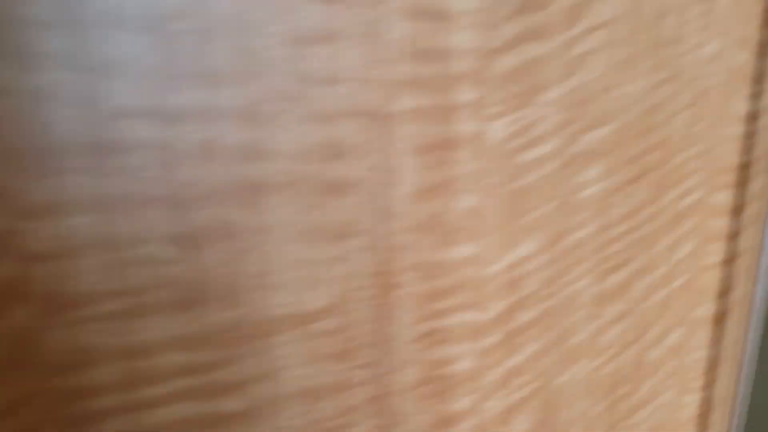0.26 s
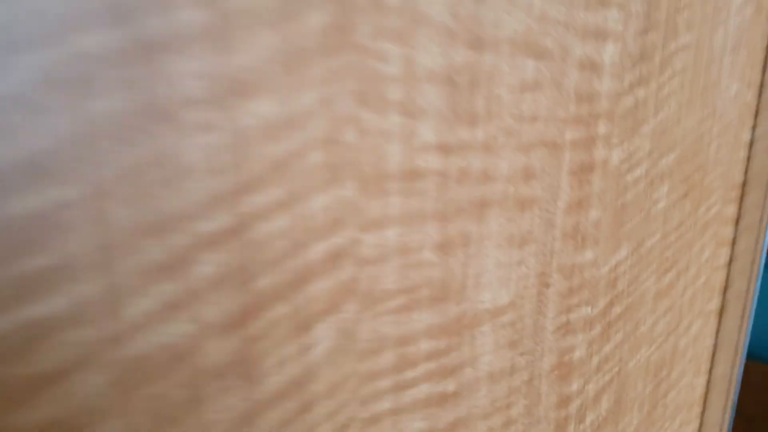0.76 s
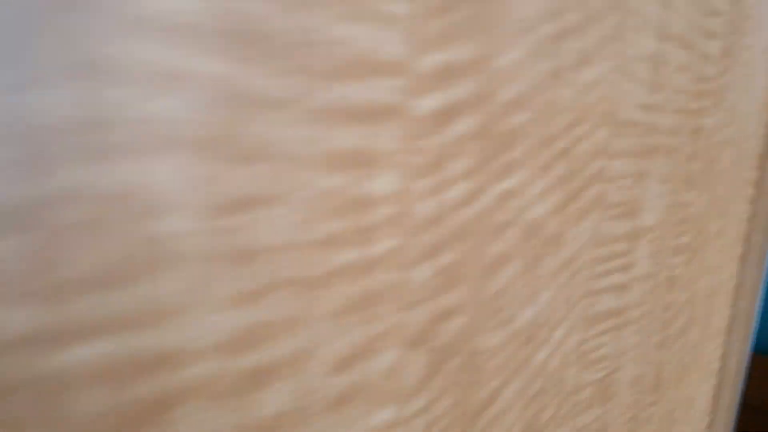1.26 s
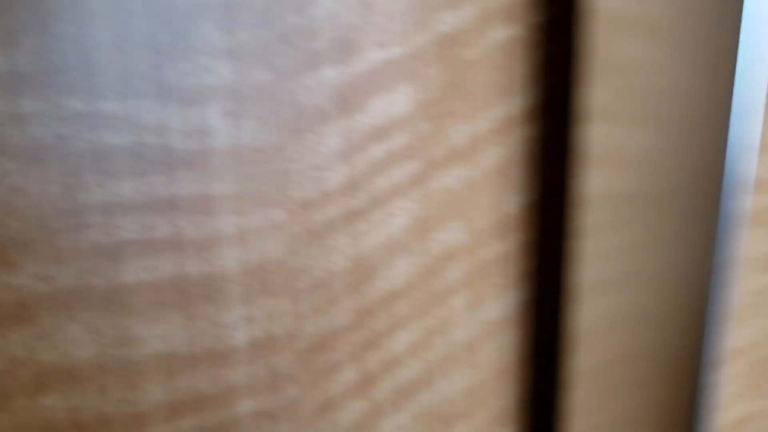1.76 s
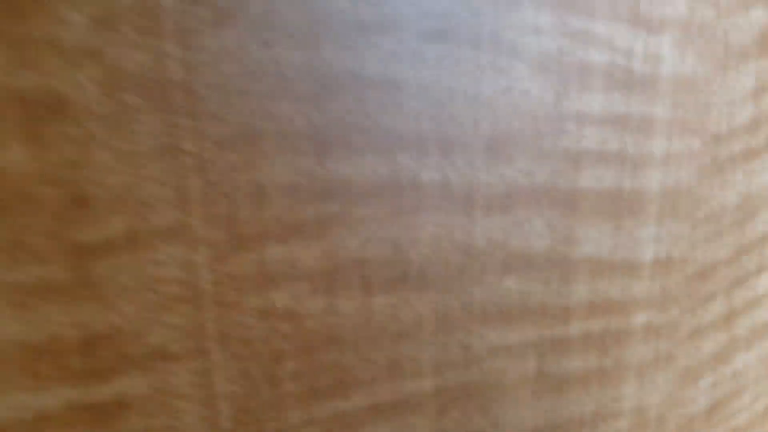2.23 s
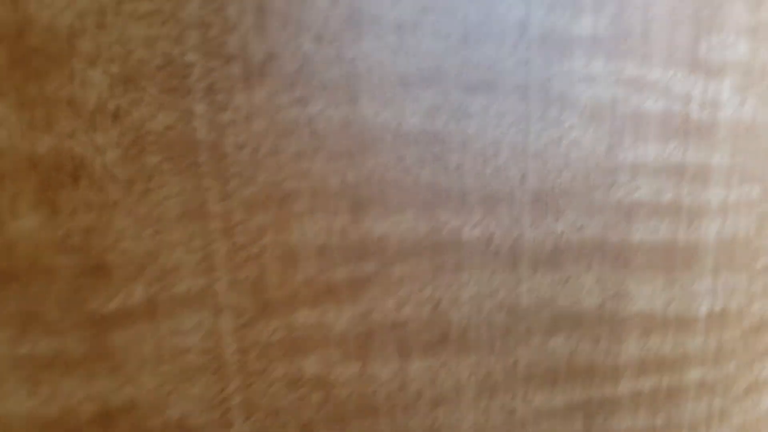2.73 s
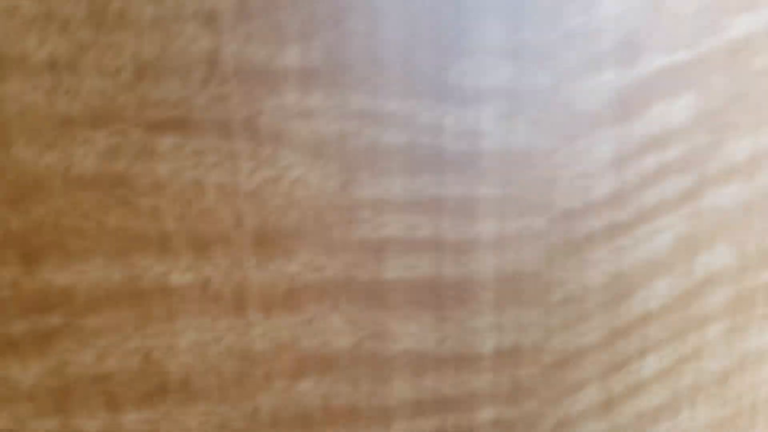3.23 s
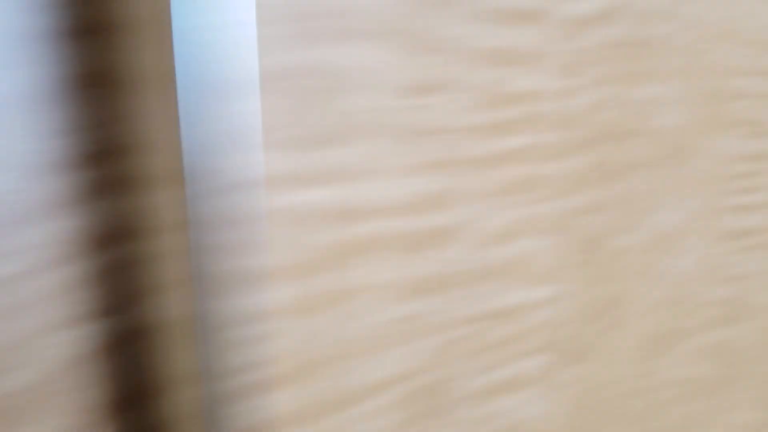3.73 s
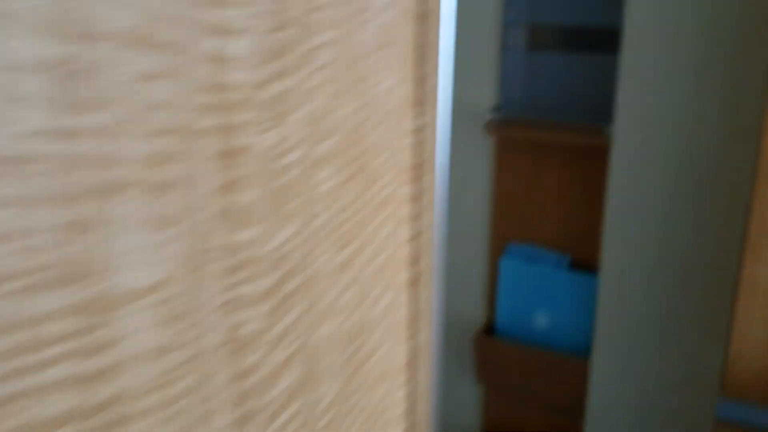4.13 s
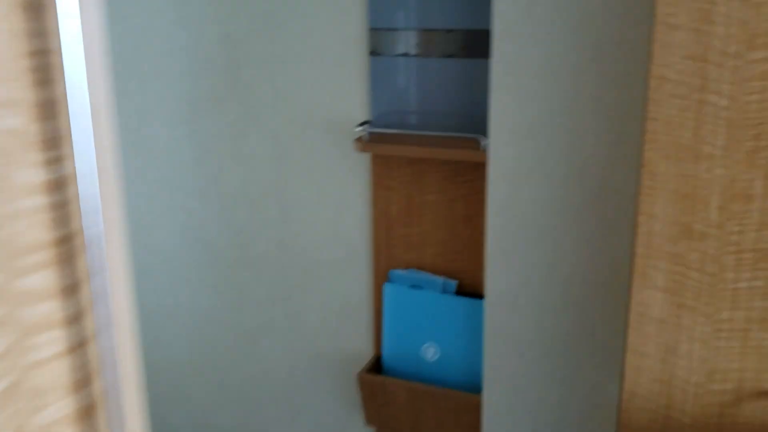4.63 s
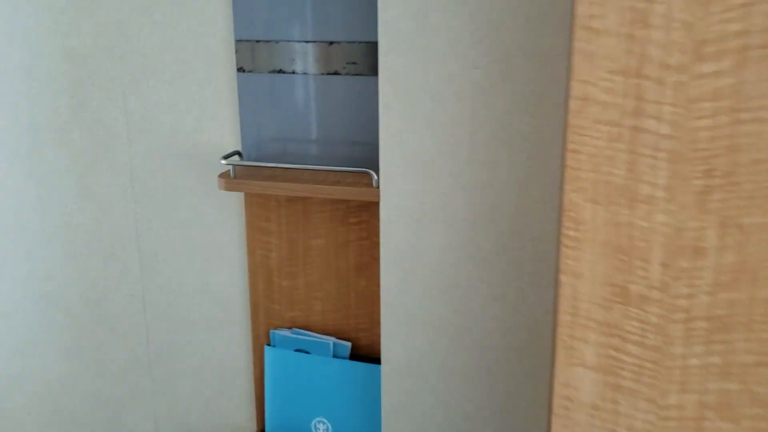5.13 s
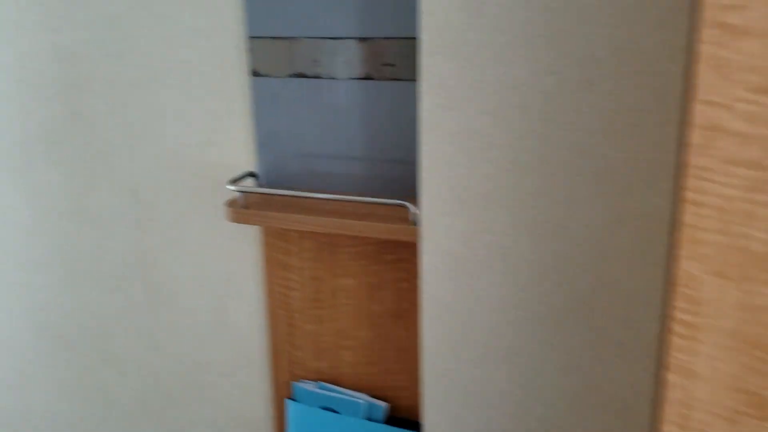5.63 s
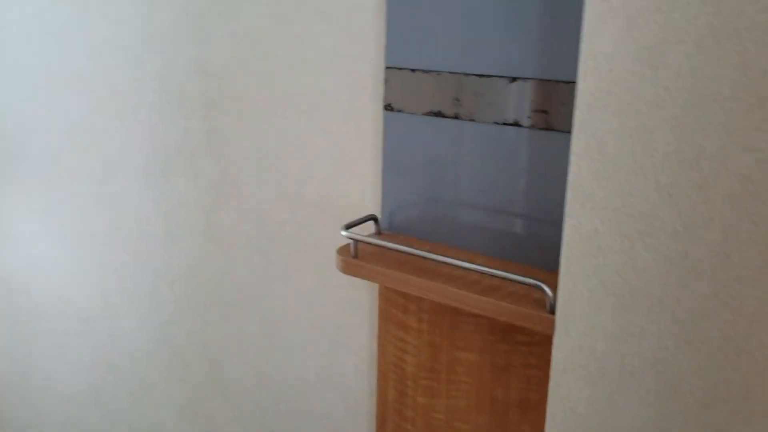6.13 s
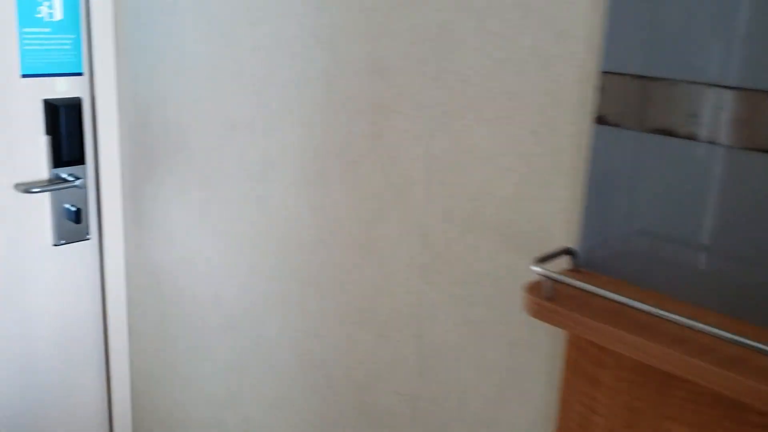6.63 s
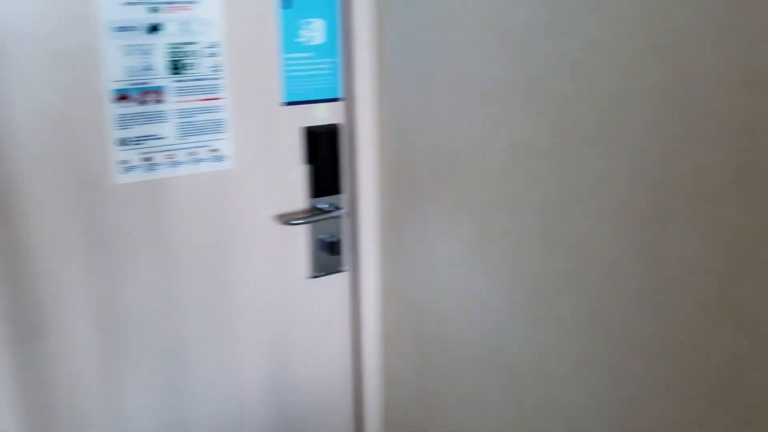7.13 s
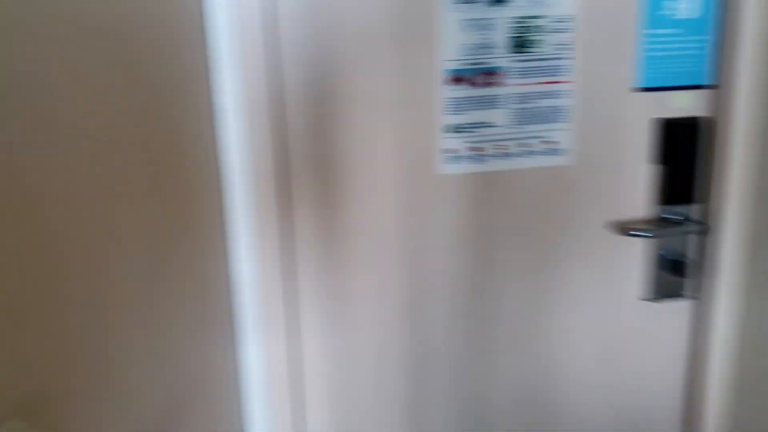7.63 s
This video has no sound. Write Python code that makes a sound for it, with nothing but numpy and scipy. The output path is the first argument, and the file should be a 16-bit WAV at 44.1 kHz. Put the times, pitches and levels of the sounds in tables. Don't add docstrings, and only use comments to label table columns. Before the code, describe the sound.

Low ventilation hum, a rumbling wooden slide ending in a sharp clack and chatter, faint handling rustles, then a hard door knock with a soft bounce.

```python
import sys
import numpy as np
from scipy import signal
from scipy.fft import rfft, irfft, next_fast_len
from scipy.io import wavfile
from scipy.ndimage import uniform_filter1d, map_coordinates

SR = 44100
rng = np.random.default_rng(int(sys.argv[2]) if len(sys.argv) > 2 else 0)


def master_out(mix):
    frames = np.transpose(np.atleast_2d(mix))
    ceiling = np.clip(frames, -1, 1)
    pcm = np.round(ceiling * 32767).astype(np.int16)
    wavfile.write(sys.argv[1], SR, pcm)


def nominal_scale(level):
    x = np.asarray(level, float) / 20
    return 10 ** x


N = 347609
TOP_HZ = 15870


def unit(x):
    return x / np.sqrt(np.mean(x ** 2) + 1e-20)


def along(points, hz):
    f, v = np.transpose(points)
    return np.interp(np.log(hz + 1), np.log(f + 1), v)


def curves(rows):
    s, *cols = np.transpose(rows)
    return [np.interp(np.arange(N) / SR, s, c) for c in cols]


def wobble(rate):
    knots = rng.standard_normal(int(N * rate / SR) + 4)
    return map_coordinates(knots, [np.arange(N) * rate / SR])


def filtered(x, response):
    m = next_fast_len(x.shape[-1] + 8192)
    spectrum = rfft(x, m) * response(np.fft.rfftfreq(m, 1 / SR))
    return irfft(spectrum, m)[..., :x.shape[-1]]


def resonant(modes):
    def response(f):
        total = 0
        for k, (centre, width, db) in enumerate(modes):
            damping = 1j * f * width
            total = total + (-1) ** k * nominal_scale(db) * damping / (centre * centre - f * f + damping)
        return total
    return response


# f/Hz, left-right likeness
COHERENCE = [(60, 1), (250, 0.97), (700, 0.53), (3000, 0.18), (12000, 0.21)]


def coherence_angle(hz):
    return np.arccos(np.clip(along(COHERENCE, hz), -1, 1)) / 2


def spread(pair, response):
    def mid_side(hz):
        angle = coherence_angle(hz)
        return response(hz) * (hz < TOP_HZ) * [np.cos(angle), np.sin(angle)]
    mid, side = filtered(pair, mid_side)
    return unit(np.array([mid + side, mid - side]))


def grit(spike_db, streak_db):
    noise = rng.standard_normal((2, N)) * nominal_scale(spike_db * rng.standard_normal(N))
    z = signal.stft(noise, nperseg=1024)[2]
    field = uniform_filter1d(rng.standard_normal(z.shape[1:]), size=3, axis=0)
    field = uniform_filter1d(field, size=14, axis=1)
    return signal.istft(z * nominal_scale(streak_db * unit(field)), nperseg=1024)[1][:, :N]


def strokes(rows, rise, fall):
    t = np.arange(0, N + 64, 64) / SR
    s, length, *levels = np.transpose(rows)[:, :, None]
    shape_db = -rise * np.clip(s - t, 0, None) - fall * np.clip(t - s - length, 0, None)
    powers = [np.sum(nominal_scale(2 * (db + shape_db)), axis=0) for db in levels]
    return [np.interp(np.arange(N) / SR, t, power) for power in powers]


def place(out, s, sound):
    start = round(s * SR)
    out[:, start:start + sound.shape[-1]] += sound


# f/Hz, level/dB per Hz
HUM_SPECTRUM = [(12, -7), (20, -2.5), (44, 1), (70, 4.5), (116, -6), (204, -22.5), (270, -8.5),
                (388, -18.5), (434, -15.5), (976, -70.5), (4540, -55), (7730, -38.5), (9140, -59),
                (14300, -53.5), (16000, -65)]


def hum():
    return nominal_scale(-50 + 2.0 * wobble(10.0)) * spread(grit(0, 1), lambda hz: nominal_scale(along(HUM_SPECTRUM, hz)))


# f/Hz, width/Hz, level/dB
SWAY_MODES = [(35.3, 8.6, -3.5), (60, 17, -9), (81.8, 10.9, 1)]
# f/Hz, width/Hz, level/dB
DRUM_MODES = [(94, 19, -3.5), (130.9, 13.4, 3), (181.9, 7.2, -1.66), (215.6, 20, -8)]
# t/s, level/dB
TREMBLE_LEVEL = [(0, -44), (.7, -44.5), (.82, -35), (.96, -31.5), (1.05, -40.5), (1.14, -30.5),
                 (1.65, -24.5), (1.86, -25), (1.97, -35), (2.11, -32), (2.17, -43), (2.22, -32),
                 (2.37, -34), (2.5, -40), (3.3, -44), (4.3, -44), (5.3, -49), (7.88, -51.5)]
# t/s, level/dB
SHAKE_LEVEL = [(0, -4.5), (1.78, 3), (1.84, 1), (2.17, -11), (2.21, 4.5), (2.45, -7), (2.55, -4.5),
               (6.9, 6), (7.05, -7.5), (7.88, -12)]
# t/s, length/s, sway level/dB, drumming level/dB
SHOVES = [(.57, 0.033, -60, -66), (.79, 0.21, -36.5, -41), (1.05, 0.2, -40, -38.5), (1.33, 0.02, -38, -26),
          (1.49, 0.023, -29, -41), (1.72, 0.045, -34, -25), (1.84, 0.036, -23, -40),
          (2.01, 0.055, -26.5, -38.5), (2.24, 0.15, -32, -50), (2.93, .03, -50, -59),
          (3.36, 0.04, -40, -56), (3.5, 0.15, -45, -66), (3.87, 0.054, -34.5, -47), (4.03, 0.022, -41, -47),
          (4.26, 0.022, -42.5, -44.5), (4.85, 0.099, -54, -45), (5.35, 0.011, -65.5, -47.5),
          (5.97, 0.022, -52, -67.5), (6.2, 0.066, -48, -43.5), (6.33, 0.015, -52, -46.5),
          (6.66, 0.16, -51.5, -62), (7.06, 0.05, -47, -55), (7.3, 0.025, -48.5, -57),
          (7.53, 0.088, -46.5, -55.5), (7.77, 0.063, -44, -61)]
SWING_HZ = 52.4
SWAY_DB = -8
SWAY_WAVERS_DB, DRUM_WAVERS_DB = 2, 2


def even(x):
    power = uniform_filter1d(np.mean(x ** 2, axis=0), size=2600)
    return x / np.sqrt(np.abs(power) + 0.17)


def panel():
    tremble_db, = curves(TREMBLE_LEVEL)
    sway_jolts, drum_jolts = strokes(SHOVES, rise=453, fall=157.5)
    sway_tremble = nominal_scale(2.034 * (tremble_db + SWAY_DB + SWAY_WAVERS_DB * wobble(10)))
    drum_tremble = nominal_scale(2.082 * (tremble_db + DRUM_WAVERS_DB * wobble(12)))
    swing = np.sin(2 * np.pi * SWING_HZ * np.cumsum(1 + 0.058 * wobble(9.9)) / SR)
    shake = nominal_scale(curves(SHAKE_LEVEL)[0])
    rough = even(spread(grit(0, 0), resonant(SWAY_MODES)))
    sway = (np.sqrt(2) * swing + shake * rough) / np.sqrt(1 + shake ** 2)
    body = resonant([(150, 200, 0)])
    drum = even(spread(grit(0, 0), lambda hz: resonant(DRUM_MODES)(hz) * body(hz)))
    return np.sqrt(sway_tremble + sway_jolts) * sway + np.sqrt(drum_tremble + drum_jolts) * drum


# f/Hz, level/dB per Hz
ROLLING_SPECTRUM = [(150, -31.5), (250, -3.5), (358, -2), (653, -4.5), (842, -5), (1020, -5.5),
                    (1300, -9.5), (3000, -17.5), (9000, -46.5), (11700, -75.5), (19800, -120)]
# f/Hz, width/Hz, level/dB
CARCASS_MODES = [(300, 150, 4), (377, 40, -9), (600, 45, -8), (900, 71, -2), (1220, 460, -4),
                 (2100, 590, -13)]


def roll(slide_db, wood_power):
    uneven = nominal_scale(1.7 * (1.3 * wobble(25) + 1.6 * wobble(8.2)))
    roll_db = 10 * np.log10(nominal_scale(2 * slide_db) + uneven * (wood_power + nominal_scale(2 * -85)))
    crowd = rng.standard_normal(1200)

    def wood(hz):
        close_modes = nominal_scale(2.6 * np.interp(hz / 14, np.arange(len(crowd)), crowd))
        carcass = 1.5 + np.abs(resonant(CARCASS_MODES)(hz)) * nominal_scale(-9.0)
        return nominal_scale(along(ROLLING_SPECTRUM, hz)) * carcass * close_modes

    grind = spread(grit(3.5, 2.2), wood)
    force = np.clip((roll_db + 72.5) / 16, 0, 1)
    dull = unit(filtered(grind, lambda hz: 1 / (1 + (hz / 850) ** 4)))
    return nominal_scale(roll_db + 0.68) * (force * grind + (1 - force) * dull)


# f/Hz, level/dB per Hz
RUSTLE_SPECTRUM = [(880, -60), (1500, 1), (1900, -4.5), (2390, -3), (3250, -2.5), (5330, -3.5), (6000, -3),
                   (7610, -1.5), (8740, -10), (15100, -5.5), (16000, -28.5)]


def rustle(slide_db, cloth_power):
    air_power = nominal_scale(2 * (-55.5 + 0.98 * (slide_db - slide_db.max())))
    air_power = air_power * (slide_db > -58) * (np.arange(N) < 2.1 * SR)
    power = uniform_filter1d(air_power, size=2000) + cloth_power + nominal_scale(2 * -86)
    hiss_db = 10 * np.log10(power) + 3.0 + 0.46 * wobble(54)
    return nominal_scale(hiss_db) * spread(grit(2.5, 1.8), lambda hz: nominal_scale(along(RUSTLE_SPECTRUM, hz)))


# t/s, rolling level/dB
DOOR_RUN = [(.64, -93), (.664, -58.5), (.85, -51), (1.01, -52), (1.09, -41.5), (1.22, -36), (1.37, -34),
            (1.75, -35.5), (1.93, -43), (2.04, -83)]
# t/s, length/s, wood level/dB, cloth level/dB
SLOW_MOVES = [(0, 0.39, -72, -73), (.42, 0.29, -75, -79.5), (2.09, 0.18, -57, -66), (.82, .08, -66, -65),
              (2.48, 0.14, -55.5, -102), (2.82, 0.11, -58.5, -75.5), (3.0, 0.33, -61, -70),
              (3.32, 0.062, -52.5, -71.5), (3.46, 0.13, -65, -70), (3.67, 0.19, -56, -62),
              (3.93, 0.12, -57, -71.5), (4.09, 0.47, -60.5, -64), (4.7, 0.092, -64.5, -69.5),
              (4.94, 0.44, -64.5, -70.5), (5.38, 0.31, -68.5, -80), (5.8, 0.33, -66.5, -74),
              (6.42, 0.17, -62.5, -75.5), (6.85, 0.55, -69.5, -75), (7.68, 0.075, -70.5, -75),
              (7.78, 0.15, -67.5, -67)]
# t/s, length/s, wood level/dB, cloth level/dB
HAND_BRUSHES = [(0.088, .05, -60, -70.5), (0.29, 0.073, -69.5, -69.5), (0.393, .02, -81, -80),
                (0.557, 0.047, -65.5, -70), (0.93, 0.031, -50, -56.5), (1.03, 0.018, -49, -57),
                (1.67, 0.018, -54, -52.5), (1.977, 0.022, -47, -66), (2.206, 0.01, -46.5, -64),
                (2.3, 0.085, -52, -72), (2.862, 0.04, -63, -77), (3.13, 0.052, -74, -68),
                (3.695, 0.012, -66, -59.5), (4.115, 0.019, -56, -68), (4.249, 0.018, -59, -63),
                (2.64, 0.13, -62, -102), (4.495, 0.013, -67, -57.5), (4.628, 0.039, -59.5, -58),
                (4.874, 0.04, -56.5, -65.5), (5.335, 0.028, -70, -81), (5.713, 0.046, -55.5, -62),
                (6.13, 0.077, -64, -66), (6.29, 0.079, -49, -58.5), (6.854, 0.023, -80, -86),
                (7.136, 0.028, -65, -71)]


def motion():
    slide_db, = curves(DOOR_RUN)
    slow = strokes(SLOW_MOVES, rise=220, fall=137)
    quick = strokes(HAND_BRUSHES, rise=600.5, fall=258)
    wood_power, cloth_power = np.add(slow, quick)
    return roll(slide_db, wood_power) + rustle(slide_db, cloth_power)


# t/s, peak level/dB,
# f/Hz, t60/s, rise/s
SINGLE_MODE_BUMPS = [(.655, -50, 339, 1, 0.0032), (.664, -56.5, 783, 0.4, 0.0013),
                     (.665, -46.5, 420, 0.39, 0.0037), (1.7598, -12.5, 2246, .007, .0003),
                     (1.76, -16, 1500, .01, 0.00027), (1.76, -21.5, 4100, .008, .0003),
                     (1.76, -10, 6210, 0.0072, 0.0002), (1.7604, -29.5, 9700, .02, .0005),
                     (1.8, -23, 406, 0.16, 0.005), (3.33, -42, 2075, 0.04, 0.002), (3.858, -32, 64.4, 0.94, 0.004),
                     (4.65, -47, 800, 0.064, 0.0031), (4.869, -42.5, 507, 0.15, 0.0035),
                     (5.35, -48, 870, 0.061, 0.0065), (6.52, -40, 675, 0.15, 0.027)]


def bumps():
    out, t = np.zeros((2, N)), np.arange(SR) / SR
    for s, db, hz, t60, rise in SINGLE_MODE_BUMPS:
        envelope = nominal_scale(db - 60 * t / t60) * (1 - np.exp(-t / rise))
        place(out, s, envelope * np.sin(2 * np.pi * hz * t))
    return out


# start t/s, end t/s, f/Hz, level/dB
LEAF_GROANS = [(1.03, 1.09, 1675, -53.5), (1.06, 1.13, 728, -45), (1.08, 1.18, 1205, -47.5),
               (1.14, 1.21, 520, -42), (1.18, 1.38, 977, -46), (1.27, 1.37, 1163, -43),
               (1.31, 1.47, 651, -38.5), (1.34, 1.5, 2230, -51.5), (1.46, 1.53, 1050, -39),
               (1.48, 1.52, 1910, -48), (1.51, 1.57, 1220, -46), (1.56, 1.76, 427, -42.5),
               (1.62, 1.75, 1120, -50.5), (2.3, 2.36, 400, -48), (2.28, 2.399, 300, -43),
               (2.3, 2.338, 1096, -51), (1.45, 1.72, 186, -33), (2.31, 2.36, 708, -52),
               (3.32, 3.366, 452, -53), (3.33, 3.37, 797, -56), (6.44, 6.5, 703, -61)]


def groans():
    t, out = np.arange(N) / SR, np.zeros((2, N))
    for start, end, hz, db in LEAF_GROANS:
        part = slice(round(start * SR), round(end * SR))
        swell = np.sin(np.pi * (t[part] - start) / (end - start)) ** 0.28
        drive = rng.standard_normal((2, len(swell)))
        mode = resonant([(hz, 0.06 * hz, 0)])
        out[:, part] += nominal_scale(db) * swell * unit(filtered(drive[0] + .6 * drive, lambda f: mode(f) ** 2))
    return out


def snap(hz, breadth):
    t = np.arange(SR // 10) / SR
    echoes = nominal_scale(-18 - 60 * t / 0.015) * rng.standard_normal((2, len(t)))
    echoes[:, 0] = 1
    mode = resonant([(hz, breadth * hz, 0)])
    x = filtered(echoes, lambda f: mode(f) ** 2 * (f < TOP_HZ + 600))
    return np.pad(x, ((0, 0), (0, SR // 2 - len(t)))) / np.abs(x).max()


# f/Hz, t60/s
CABIN_DECAY = [(200, 1), (600, 0.24), (2000, 0.21), (5000, 0.24), (8500, 0.18), (14000, 0.23)]
# f/Hz, level/dB
CABIN_SPECTRUM = [(150, -12), (350, 7), (750, -1), (1500, 0), (3000, -6.5), (7500, -1), (9000, -7.5),
                  (16000, -9)]


def cabin(x):
    hz, t, z = signal.stft(rng.standard_normal(x.shape), SR, nperseg=256)
    angle = coherence_angle(hz)[:, None]
    z = np.cos(angle) * z[0] + np.sin(angle) * z[1] * [[[1]], [[-1]]]
    decay_db = along(CABIN_SPECTRUM, hz)[:, None] - 60 * t / along(CABIN_DECAY, hz)[:, None]
    z = z * (hz < TOP_HZ - 100)[:, None] * nominal_scale(decay_db)
    tail = signal.istft(z, SR, nperseg=256)[1][:, :x.shape[1]]
    delayed = np.pad(x[:1, :1500], ((0, 0), (110, 0)))
    return signal.fftconvolve(delayed, tail / np.linalg.norm(tail[0]), axes=1)[:, :x.shape[1]]


# t/s, peak
# level/dB, tip f/Hz, overtone level/dB, room level/dB
SMALL_TICKS = [(1.287, -28, 1400, -4, -3), (2.0429, -28, 2430, -0.5, -5.5), (2.212, -39.5, 1520, 1, -5),
               (2.3035, -28.5, 4200, -13, -4.5), (2.3008, -28, 5900, -15, -4),
               (2.2999, -35, 1070, 1.5, 2), (3.331, -32.5, 1570, -19, -7),
               (3.388, -36.5, 2400, 1.5, -4.5), (4.1, -46, 2570, -17, 0), (3.9634, -44, 2300, 8.5, -10),
               (3.978, -41.5, 1400, -18, 1.5), (5.8, -53.5, 2000, 6.5, 9), (5.72, -50, 2550, -2, 12),
               (4.59, -50, 6300, 10, 4), (6.1294, -44.5, 3700, -0.5, 3)]


def ticks():
    out = np.zeros((2, N))
    for s, db, tip_hz, second_db, room_db in SMALL_TICKS:
        tick = snap(tip_hz, breadth=0.44) + nominal_scale(second_db) * snap(1.97 * tip_hz, breadth=0.54)
        place(out, s, nominal_scale(db) * (tick + nominal_scale(room_db) * cabin(tick)))
    return out


def blow(modes, tip_hz, ring_db, bright_db, room_db):
    t = np.arange(SR // 2) / SR
    crack = nominal_scale(bright_db) * snap(6000, breadth=1.3) + snap(tip_hz, breadth=1.46)
    rise = 1 - np.exp(-t / 0.0013)
    ring = 0
    for hz, db, t60 in modes:
        stray = np.cumsum(rng.standard_normal((2, len(t))), axis=1) * .04 * np.log(hz / 260)
        ring = ring + nominal_scale(db - 60 * t / t60) * np.sin(2 * np.pi * hz * t + stray)
    return crack + nominal_scale(ring_db) * rise * ring + nominal_scale(room_db) * cabin(crack)


def blows(modes, events):
    out = np.zeros((2, N))
    for s, db, tip_hz, ring_db, room_db in events:
        place(out, s, nominal_scale(db) * blow(modes, tip_hz, ring_db, -0.5 + 1.4 * db, room_db))
    return out


# t/s, peak level/dB, tip f/Hz, ring level/dB, room level/dB
CATCH_BLOWS = [
    (1.76, -8.5, 1266, -11.5, 0),
    (1.769, -19, 1390, -6.5, 3.5),
]
# f/Hz, level/dB, t60/s
CATCH_MODES = [(740, -11.5, 0.23), (962, -2, 0.21), (1150, -8.5, 0.17), (1457, 2.5, 0.11),
               (2200, -0.5, 0.05), (1630, -5, 0.038), (2400, -14, 0.059), (6300, -7.5, 0.03),
               (6900, -18, 0.13)]
# t/s, peak level/dB, tip f/Hz, ring level/dB, room level/dB
CHATTER_BLOWS = [
    (1.779, -24, 1000, -7, -1),
    (1.789, -16.5, 2004, -4.5, -2),
    (1.799, -23.5, 1893, -8, 1),
    (1.81, -24.5, 1094, -4.5, -1),
    (1.821, -27.5, 1500, -6, -0.5),
    (1.838, -27, 1980, -5, -1),
]
# f/Hz, level/dB, t60/s
RUNNER_MODES = [(748, -9.5, 0.092), (945, -2, 0.07), (1143, -3.5, 0.13), (1419, -2, 0.059),
                (1660, -3, 0.065), (2165, -2.5, 0.031), (2400, -11.5, .06)]


def catch():
    return blows(CATCH_MODES, CATCH_BLOWS) + blows(RUNNER_MODES, CHATTER_BLOWS)


# t/s, peak level/dB, tip f/Hz, right microphone
# level/dB, room level/dB
NAIL_CLICK = [
    (2.2996, -13, 6300, -15, -11),
]


def near_click():
    (s, db, tip_hz, far_db, room_db), = NAIL_CLICK
    tick, out = snap(tip_hz, breadth=1.5), np.zeros((2, N))
    place(out, s, nominal_scale(db) * (nominal_scale([[0], [far_db]]) * tick + nominal_scale(room_db) * cabin(tick)))
    return out


# start t/s, end t/s, f/Hz, level/dB
FAINT_WHINES = [(5.041, 5.346, 4000, -77), (5.494, 5.709, 6300, -82.5), (5.864, 6.048, 5030, -75),
                (6.049, 6.22, 1550, -64), (5.947, 6.105, 4140, -71), (6.003, 6.205, 3270, -69),
                (6.479, 6.597, 3240, -76), (6.674, 7.044, 3900, -76.5)]


def whines():
    t, out = np.arange(N) / SR, np.zeros(N)
    for start, end, hz, db in FAINT_WHINES:
        swell = np.sin(np.pi * np.clip((t - start) / (end - start), 0, 1))
        drift = np.cumsum(1 + .016 * wobble(40)) / SR
        breath = .4 + 0.97 * wobble(250)
        out += nominal_scale(db) * swell * breath * np.sin(2 * np.pi * hz * drift)
    return out


# t/s, peak level/dB, tip f/Hz, ring level/dB, room level/dB
KNOCK_BLOWS = [
    (6.2064, -13.5, 2400, -11, 1),
    (6.2093, -3, 1199, -18, -7.5),
    (6.2124, -7, 1470, -14, -3),
]
# f/Hz, level/dB, t60/s
DOOR_MODES = [(200, -6, 0.098), (317, -3, 0.17), (391, 2, 0.12), (461.5, -1, 0.11), (629, 1.5, 0.094),
              (780, -13, 0.1), (920, -11, 0.24), (1026, -11, .08), (1271, -10, .13), (1373, -8.5, 0.08),
              (1720, -13, 0.14), (2044, -12, 0.14), (2290, -16, 0.15), (2960, -18, 0.071)]
# t/s, peak level/dB, tip f/Hz, ring level/dB, room level/dB
BOUNCE_BLOWS = [
    (6.3421, -22.5, 989, -6.5, -3),
    (6.3443, -28.5, 709, -7, -3),
]
# f/Hz, level/dB, t60/s
EDGE_MODES = [(320, -0.5, 0.17), (400, -6, .07), (570, -4, .1), (840, -14.5, 0.27), (1087, -8, .07),
              (1410, -11.5, .12), (1640, -15, 0.13), (2073, -16, .1)]


def knock():
    return blows(DOOR_MODES, KNOCK_BLOWS) + blows(EDGE_MODES, BOUNCE_BLOWS)


def scene():
    steady = hum() + panel() + motion()
    return steady + bumps() + groans() + ticks() + catch() + near_click() + whines() + knock()


def low_pass(x):
    return signal.sosfilt(signal.butter(12, 16970, fs=SR, output="sos"), x)


# t/s, lag of left/samples, left-right level/dB
PHONE_AIM = [(0, -7, 1.3), (.6, -5, 2), (.95, -18, 3.6), (2.3, -21, 3), (2.7, -23.5, 1.5), (4.1, -17.5, 2),
             (4.6, 7.5, 1.6), (6, 10.5, 0.5), (6.15, 18.5, -1.5), (6.45, 15, 0), (7, 10, 0),
             (7.88, -1.5, 0)]


def record(dry):
    lag, lean_db = curves(PHONE_AIM)
    ports = []
    for x, side in zip(dry, (1, -1)):
        delayed = map_coordinates(x, [np.arange(N) - side * lag / 2], mode="nearest")
        ports.append(nominal_scale(side * lean_db / 2) * delayed)
    mix = np.array(ports)
    return low_pass(mix)


dry = scene()
out = record(dry)
master_out(out)
```